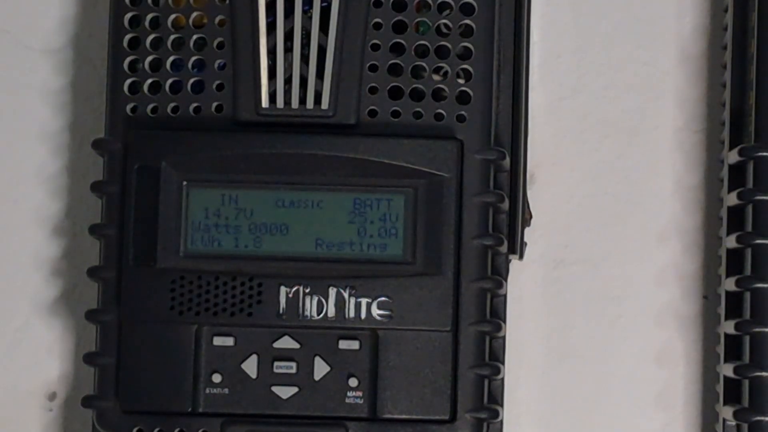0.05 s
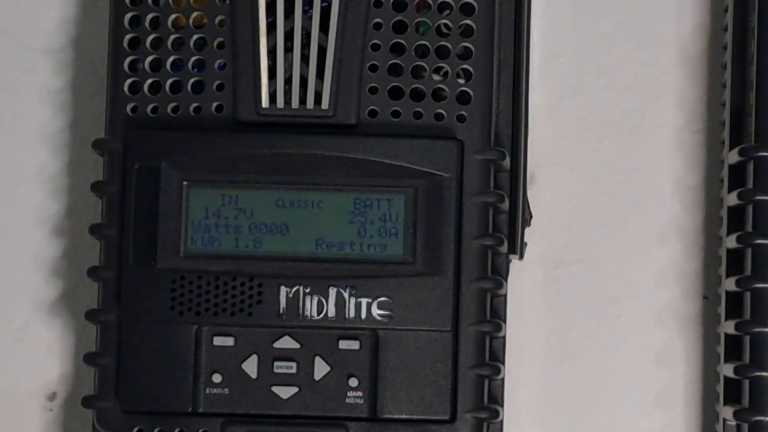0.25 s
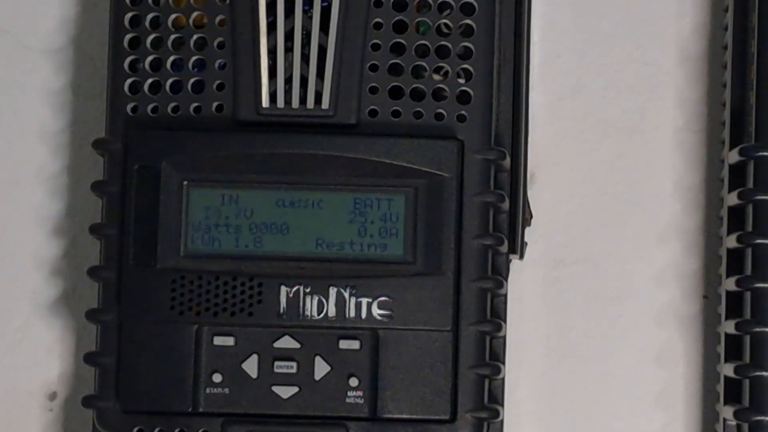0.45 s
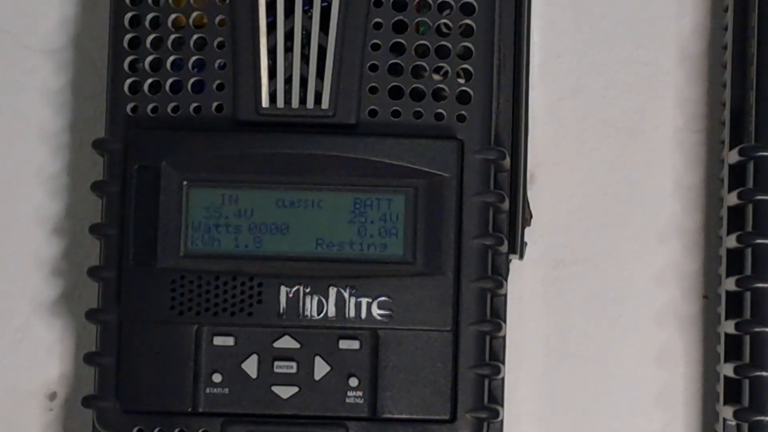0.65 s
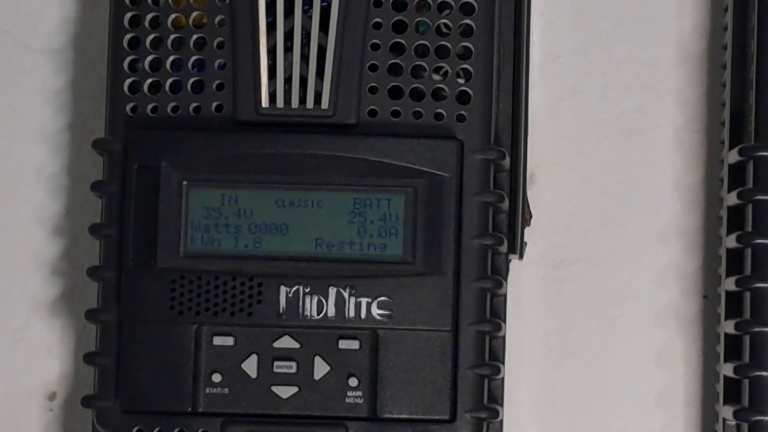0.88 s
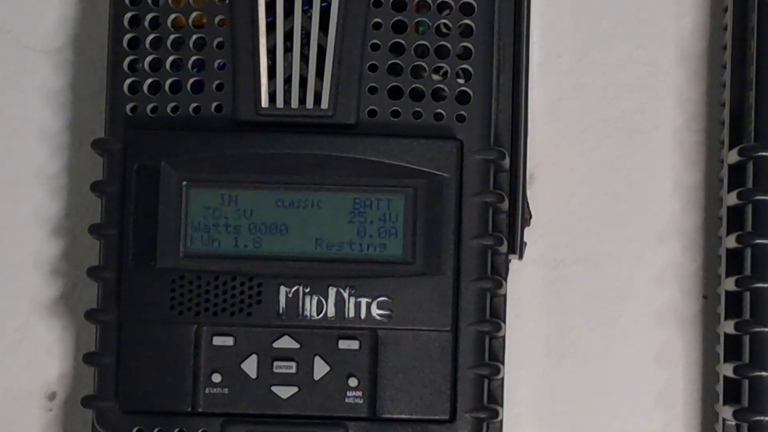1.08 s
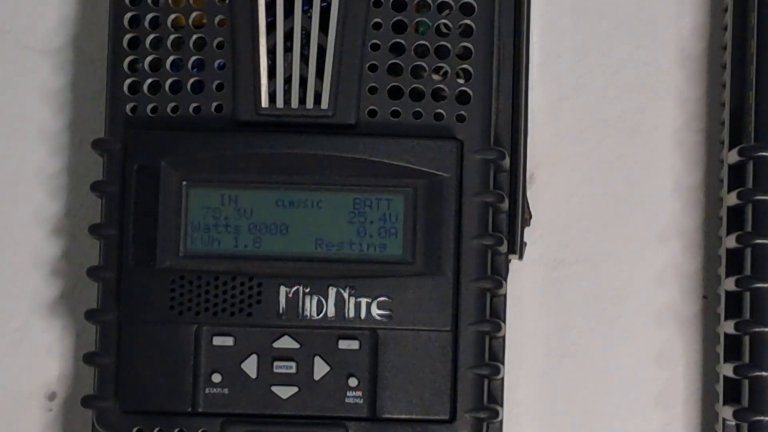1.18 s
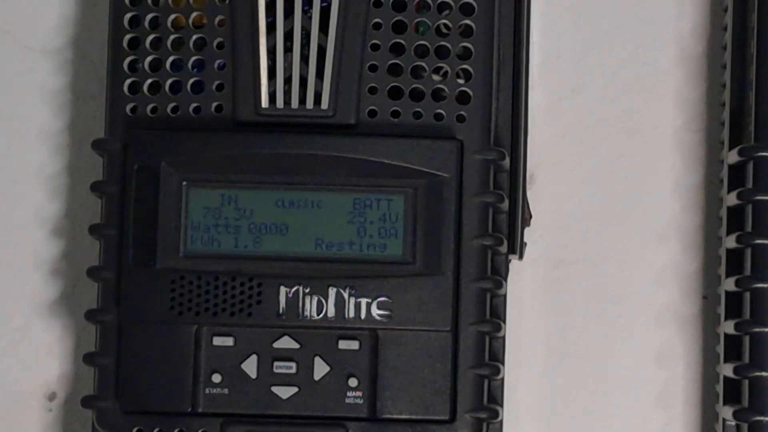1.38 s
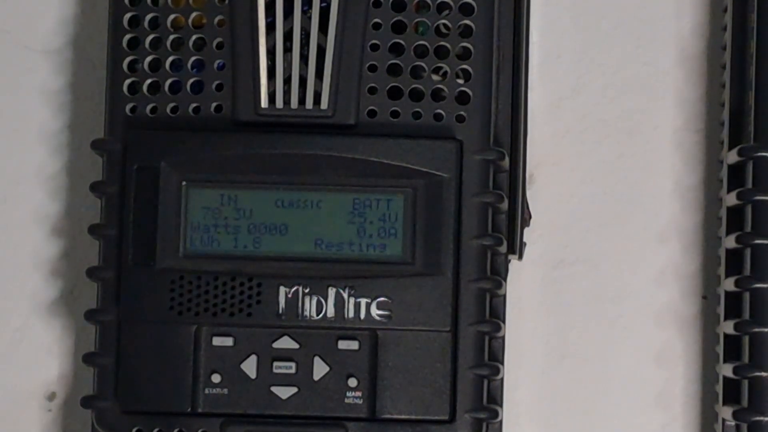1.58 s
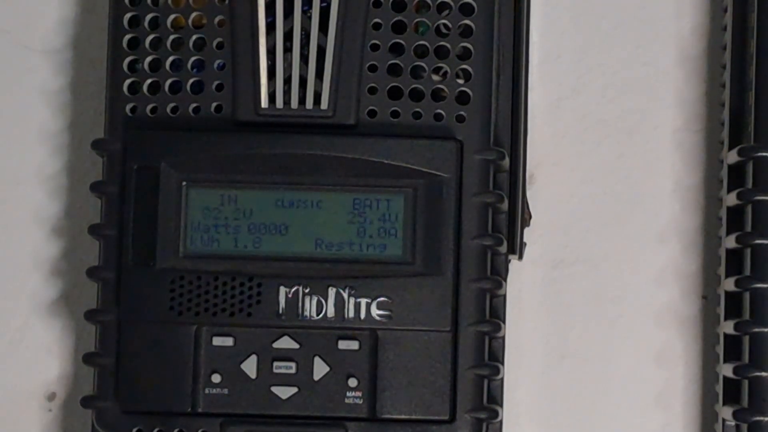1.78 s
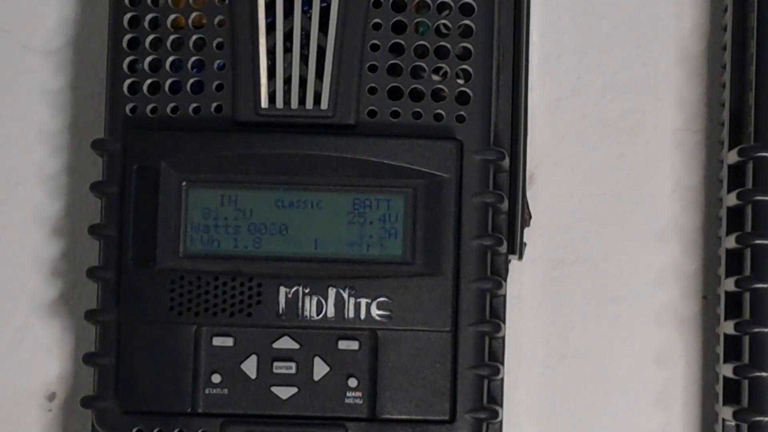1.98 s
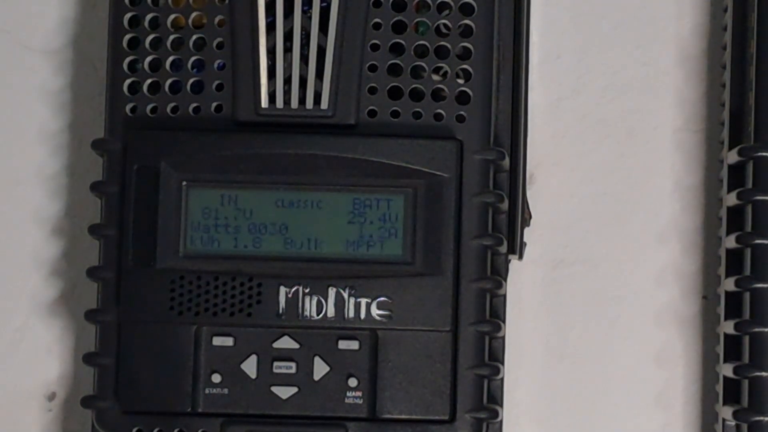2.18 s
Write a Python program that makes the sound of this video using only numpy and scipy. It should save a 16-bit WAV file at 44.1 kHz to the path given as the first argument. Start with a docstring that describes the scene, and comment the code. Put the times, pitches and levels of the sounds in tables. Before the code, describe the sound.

Close by on the right, breakers snap over in a quick series, knocking their metal cabinet into short ringing. A light click and soft handling follow, leaving the small, echoing room's quiet rumble and thin electronic whine.

```python
"""Heavy breaker switches flipped on in a metal cabinet, heard close up in a small, bare, echoing room.
Each contact thumps the panel, knocks the box into ringing, cracks in the plastic housing and rings a
spring. The cabinet stands to the right of a stereo microphone; the room carries each blow on, both sides.
A lever creaks; later come a faint hiss, a tick and soft handling noise.
Under it all lie a low rumble and a thin electronic whine."""
import sys
import numpy as np
from scipy import signal
from scipy.fft import rfft, irfft
from scipy.io import wavfile

SR = 44100
rng = np.random.default_rng(int(sys.argv[2]) if len(sys.argv) > 2 else 0)


def dump_mix(stems):
    """Bounce the given channels to the path in sys.argv[1] as a 16-bit WAV at rate SR."""
    frames = np.atleast_2d(stems).T  # one column per channel
    limited = np.clip(frames, -1, 1)  # hard clip at full scale
    pcm = np.round(limited * 32767).astype(np.int16)
    wavfile.write(sys.argv[1], SR, pcm)


N = 99225
T = np.arange(N) / SR
BLOW_T = T[:SR]   # each blow lasts a second
HZ = np.maximum(np.arange(SR + 1) / 2, 1)   # frequency axis of the gain curves

# Room tone, mostly rumble: (frequency [Hz], relative level [dB])
ROOM_TONE = [(25, -45.5), (50, -27.5), (75, -22.5), (120, -32), (300, -44.5), (700, -47.5), (2000, -56),
             (6000, -67.5), (9000, -80), (11000, -68.5), (12000, -67.5), (13000, -64), (16000, -58.5)]
# Levers snap over, bounce and settle; the last row is a soft handling thud.
# Where a blow lands sets which resonances answer most:
# (time [s], thump gain [dB], thump centre [Hz], knock gain [dB], knock centre [Hz], crack gain [dB],
#  crack tilt [dB/octave], crack bottom [Hz], crack top [Hz], direct crack boost [dB], spring gain [dB])
CONTACTS = [ (0.081, -77, 300, -61, 700, -44, -4.5, 2000, 8950, 11, -65),
            (0.099, -73, 300, -41, 800, -46, -8, 700, 7900, 14, -63),
            (0.2269, -6.5, 237, 3.5, 734, 0, -2, 700, 17550, 13.5, -6.5),
            (0.4434, -48, 300, -18.5, 800, -15, -1.5, 1800, 16000, 16.5, -25),
            (0.5045, -3, 390, -3, 650, -13, -4, 600, 15000, 20.5, -37.5),
            (0.7884, -1, 283, -8.5, 700, -32, -3, 600, 7800, 14.5, -60),
            (0.929, -18, 330, -19, 850, -35.5, -7, 900, 4000, 22.5, -35),
            (0.946, -46, 330, -41, 850, -33, -3.5, 900, 13960, 14.5, -51),
            (0.980, -29.5, 330, -14, 1120, -17, -6.5, 800, 3840, 10.5, -42.5),
            (0.988, -0.5, 328.2, -15.5, 934, -15.5, -5, 700, 4660, 18, -36),
            (1.0159, -13, 304.4, -29, 964, -19.5, -6, 700, 4920, 24, -34),
            (1.208, -5, 320, -12.5, 950, 2, 0, 700, 17000, 7, -9.5),
            (1.232, -30, 320, -11.5, 1000, 3, 0.5, 700, 11390, -9.5, -12),
            (1.5123, -3.5, 335, -7.5, 880, -13.5, -5.5, 700, 6960, 19.5, -42.5),
            (1.6692, -51.5, 330, -42.5, 800, -18.5, -4, 2200, 15000, 20.5, -23),
            (2.127, -46.5, 260, -46, 800, -54.5, -15, 700, 2960, -2.5, -63.5)]
# Dense resonances of the panel, the metal box and the plastic housing: (frequency [Hz], gain [dB])
PANEL_RESPONSE = [(60, -19), (120, -16), (170, 2), (215, 3), (260, 1.5), (320, 4), (370, 10), (440, 2),
                  (560, -23), (1200, -55.5)]
BOX_RESPONSE = [(150, -5.5), (380, -20.5), (510, 7.5), (720, 6.5), (1000, 3.5), (1300, -9.5), (1650, -15),
                (1900, -13), (2200, -28.5), (5000, -60)]
HOUSING_RESPONSE = [(200, 4.5), (620, -26), (850, 0), (1100, 4), (1480, 3), (1900, 0.5), (2150, 1),
                    (2500, 4), (3200, -1.5), (3900, 1), (4800, 0), (6000, -0.5), (7400, 3.5), (8200, -11),
                    (9500, -5), (11000, -0.5), (15500, 1.5)]
# Ringing modes of the panel and the spring: (frequency [Hz], relative level [dB])
PANEL_MODES = [(253, -5.5), (283, -8), (305, -2), (327, -2), (370, -5), (406, -5.5), (431, -2.5)]
SPRING_MODES = [(2288, -3.5), (2352, 2), (2405, 1), (2447, -5), (2520, -18), (2640, -12.5)]
# Ringing modes of the box: (frequency [Hz], relative level [dB], time to fall 60 dB [s])
BOX_MODES = [(478.4, -2.5, .42), (515, -6, 0.59), (608.6, -18, .45), (648.5, -7, 0.4), (676, -6.5, .35),
             (742, -3, .42), (844, -6, 0.26), (831, -2.5, .3), (918, -12, .4), (911, -4.5, 0.18),
             (996, -7.5, .42), (1070, -8.5, .45)]
# Reverberation of the bare room: (frequency [Hz], time to fall 60 dB [s])
ROOM_T60 = [(100, .6), (300, 0.66), (700, 0.47), (1500, 0.46), (3000, 0.45), (6500, 0.44), (10000, 0.41),
            (15000, 0.31)]
# How alike the room sounds in both channels: (frequency [Hz], left-right correlation [0-1])
ROOM_LIKENESS = [(100, 1), (300, 0.44), (600, 0.88), (1200, 0.17), (12000, .03)]
# A lever creak, a faint hiss, two bands of handling noise and a tick:
# (time [s], length [s], level on the right [dB], centre [Hz], width [Hz])
SMALL_NOISES = [(0.916, 0.084, -47, 2600, 300), (2.02, 0.2, -67, 6730, 1400),
                (2.125, 0.18, -50.5, 230, 130), (2.132, 0.15, -59, 1206, 872),
                (2.208, 0.0165, -57.5, 4580, 700)]

LEFT_LAG_S, DIRECT_LEFT_DB, ROOM_LEFT_DB = 0.00028, -12, -1   # the microphone's left side is the far one
PANEL_T60_S, SPRING_T60_S = .46, .55
PANEL_RING_DB, BOX_RING_DB, SPRING_RING_DB = -20, -18.5, -26.5
PANEL_DIRECT_DB, BOX_DIRECT_DB, FLEX_DB = 1.5, -1.5, -10.5
CUTOFF_HZ = 16000


def from_db(db):
    """Decibels to gain."""
    return 10 ** (np.asarray(db) / 20)


def at_hz(points, hz):
    """Read a table on a log-frequency axis."""
    frequencies, values = np.transpose(points)
    return np.interp(np.log(hz), np.log(frequencies), values)


def left(db):
    """Gains of the two channels, the left one changed by db."""
    return np.array([[from_db(db)], [1]])


def power_sum(*curves_db):
    """Add gain curves in dB by their power."""
    return 10 * np.log10(sum(from_db(curve) ** 2 for curve in curves_db) + 1e-20)


def colour(x, curve_db):
    """Causal (minimum-phase) filter with the given gain curve."""
    cepstrum = irfft(np.log(from_db(curve_db) + 1e-5))
    cepstrum[1:SR] *= 2
    cepstrum[SR + 1:] = 0
    response = irfft(np.exp(rfft(cepstrum)))[:SR // 10]
    return signal.fftconvolve(x, response[None], axes=1)[:, :x.shape[1]]


def band_noise(hz, width_hz):
    """Stereo noise in one resonance, rms 1."""
    band = colour(rng.standard_normal((2, N)), -20 * np.log10(1 + (2 * (HZ - hz) / width_hz) ** 2))
    return band / band.std()


def dying(t, t60, bend=1.173):
    """A decay that loses 60 dB in t60 and steepens a little on the way."""
    return from_db(-60 * (np.maximum(t, 0) / t60) ** bend)


def room_tone(gain_db=-1.5):
    """The steady low rumble and hiss of the place, stronger on the right."""
    return colour(rng.standard_normal((2, N)), at_hz(ROOM_TONE, HZ) + gain_db) * left(-5.5)


def whine(hz=12000.5, ripple_hz=120, ripple_depth=.33):
    """A thin electronic tone far to the right, pulsing with the mains inside a narrow hiss."""
    ripple = 1 + ripple_depth * np.sin(2 * np.pi * ripple_hz * T)
    tone = np.sqrt(2) * np.sin(2 * np.pi * hz * T) * ripple
    hiss = band_noise(hz, width_hz=700)
    return (from_db(-59) * tone + from_db(-66.5) * hiss) * left(-21)


def strike_focus(centre_hz, steepness_db, max_loss_db=11.5):
    """Gain curve in dB: a blow favours the resonances around its centre."""
    return -np.minimum(steepness_db * np.log2(HZ / centre_hz) ** 2, max_loss_db)


def crack_band(tilt_db, bottom_hz, top_hz):
    """Gain curve in dB of a crack in the plastic: tilted about 2 kHz, rolled off at both ends."""
    slope = tilt_db * np.log2(np.maximum(HZ, 800) / 2000)
    roll_off = 10 * np.log10(1 + (HZ / top_hz) ** 10 + (bottom_hz / HZ) ** 8)
    return slope - roll_off


def direct_burst(decay_s, rise_s=0.00087):
    """The short burst straight from switch to microphone, first and louder on the right."""
    burst = rng.standard_normal(SR) * np.exp(-(BLOW_T / decay_s) ** 2) * (1 - np.exp(-BLOW_T / rise_s))
    delayed = np.interp(BLOW_T - LEFT_LAG_S, BLOW_T, burst)
    return np.array([delayed, burst]) * left(DIRECT_LEFT_DB)


def room_tail(build_s=0.0012, hold_s=0.024):
    """Dense reflections build up, hold, then die band by band; the bass is alike in both channels."""
    edges_hz = np.concatenate([[0], np.geomspace(200, 14000, 12), [SR]])
    bins_hz = HZ[::2]
    mid, side = rfft(rng.standard_normal((2, SR)))
    alike = at_hz(ROOM_LIKENESS, bins_hz)
    spectrum = np.sqrt((1 + alike) / 2) * mid + np.sqrt((1 - alike) / 2) * side * [[1], [-1]]
    tail = 0
    for low, high in zip(edges_hz, edges_hz[1:]):
        t60 = at_hz(ROOM_T60, np.sqrt((low + 1) * min(high, CUTOFF_HZ)))
        band = irfft(spectrum * ((bins_hz >= low) & (bins_hz < high)))
        tail += band * dying(BLOW_T - hold_s, t60)
    return tail * (1 - np.exp(-BLOW_T / build_s)) * left(ROOM_LEFT_DB)


def ringing(modes, drive_db, spread_db=1, swell_s=0.00068):
    """Struck modes decay; each blow varies them, and the room shifts their phase between channels."""
    ring = 0
    for hz, db, t60 in modes:
        size, skew = rng.standard_normal(2)
        left_shift = 2 * np.pi * hz * LEFT_LAG_S + skew * np.sqrt(1 - at_hz(ROOM_LIKENESS, hz))
        phase = 2 * np.pi * (hz * BLOW_T + rng.random())
        gain = from_db(db + np.interp(hz, HZ, drive_db) + spread_db * size)
        ring += gain * dying(BLOW_T, t60) * np.sin([phase - left_shift, phase])
    return ring * (1 - np.exp(-BLOW_T / swell_s)) * left(ROOM_LEFT_DB)


def panel_flex(hz, rise_s=.003, decay_s=0.0089):
    """A few quickly damped swings of the struck panel, straight to the microphone."""
    t = np.maximum(BLOW_T - np.array([[LEFT_LAG_S], [0]]), 0)
    envelope = np.exp(-t / decay_s) * (1 - np.exp(-t / rise_s))
    return np.sin(2 * np.pi * hz * t) * envelope * left(DIRECT_LEFT_DB / 2)


def switches(noise_db=-13):
    """Every contact sounds the panel, box, housing and a spring: direct sound, room tail and ringing."""
    track = np.zeros((2, N + SR))
    panel_modes = [(hz, db, PANEL_T60_S) for hz, db in PANEL_MODES]
    spring_modes = [(hz, db, SPRING_T60_S) for hz, db in SPRING_MODES]
    for (time_s, thump_db, thump_hz, knock_db, knock_hz,
         crack_db, tilt_db, bottom_hz, top_hz, direct_db, spring_db) in CONTACTS:
        # Gain curves in dB: how the blow drives each part, then how the part answers.
        thump = thump_db + strike_focus(thump_hz, steepness_db=21.5)
        knock = knock_db + strike_focus(knock_hz, steepness_db=6.5)
        crack = crack_db + crack_band(tilt_db, bottom_hz, top_hz)
        panel = at_hz(PANEL_RESPONSE, HZ) + thump
        box = at_hz(BOX_RESPONSE, HZ) + knock
        housing = at_hz(HOUSING_RESPONSE, HZ) + crack
        cabinet = power_sum(panel + PANEL_DIRECT_DB, box + BOX_DIRECT_DB)

        near = colour(direct_burst(decay_s=.0036), housing + direct_db)
        near += colour(direct_burst(decay_s=0.022), cabinet)
        room = colour(room_tail(), power_sum(panel, box, housing))
        rings = ringing(panel_modes, thump + PANEL_RING_DB)
        rings += ringing(BOX_MODES, knock + BOX_RING_DB)
        rings += ringing(spring_modes, np.full_like(HZ, spring_db + SPRING_RING_DB))
        flex = from_db(thump_db + FLEX_DB) * panel_flex(thump_hz)
        start = int(time_s * SR)
        track[:, start:start + SR] += from_db(noise_db) * (near + room) + rings + flex
    return track[:, :N]


def creak_and_handling():
    """A lever creak, a faint hiss, handling noise and a tick: noise bands that swell quickly and fade."""
    track = 0
    for time_s, length_s, db, hz, width_hz in SMALL_NOISES:
        progress = np.clip((T - time_s) / length_s, 0, 1)
        swell = np.sin(np.pi * np.sqrt(progress))
        track += from_db(db) * swell * band_noise(hz, width_hz)
    return track * left(-2)


def scene():
    """What reaches the microphone: switches and small noises over the quiet room."""
    return switches() + creak_and_handling() + room_tone() + whine()


def record(dry):
    """The recorder rounds the highest peaks and cuts the top treble steeply."""
    lowpass = signal.ellip(12, .1, 70, CUTOFF_HZ, fs=SR, output="sos")
    return signal.sosfilt(lowpass, np.tanh(dry))


dry = scene()
out = record(dry)
dump_mix(out)
```